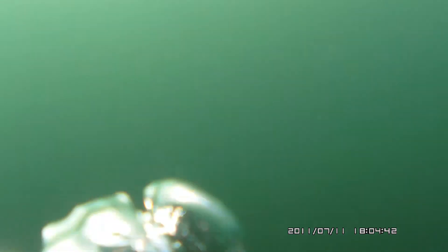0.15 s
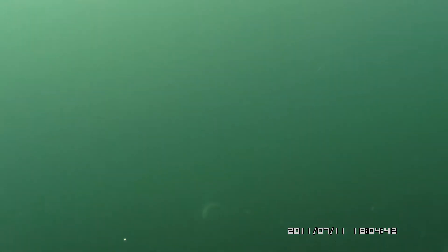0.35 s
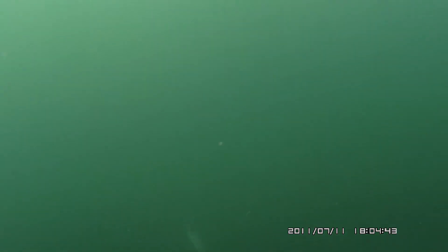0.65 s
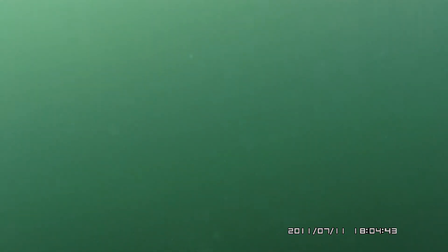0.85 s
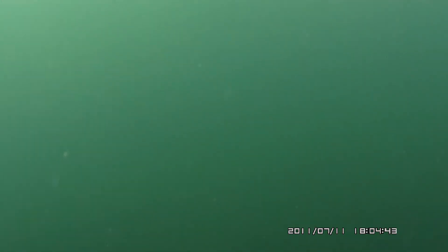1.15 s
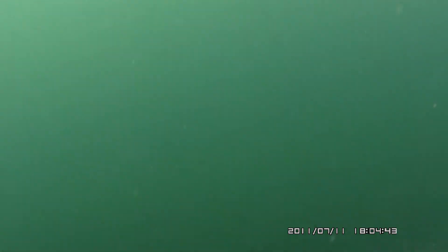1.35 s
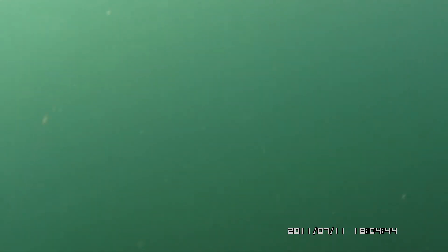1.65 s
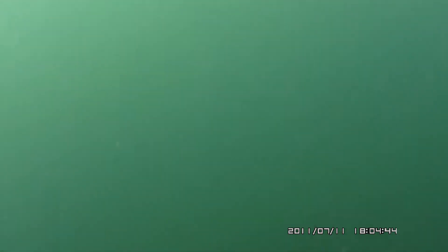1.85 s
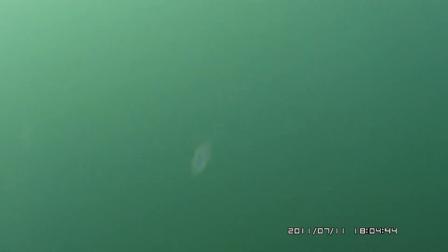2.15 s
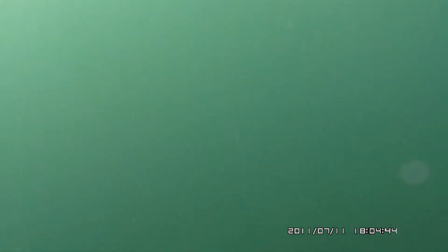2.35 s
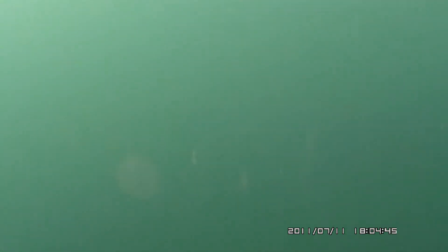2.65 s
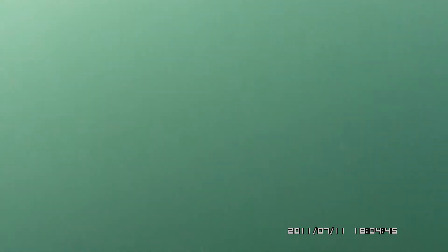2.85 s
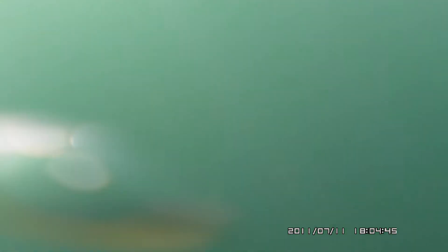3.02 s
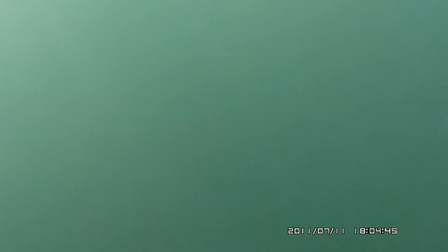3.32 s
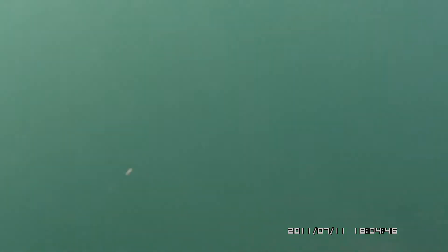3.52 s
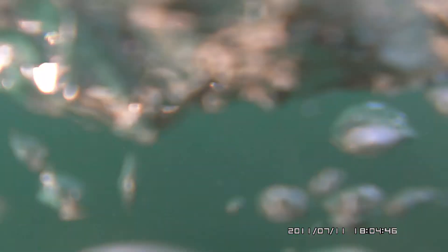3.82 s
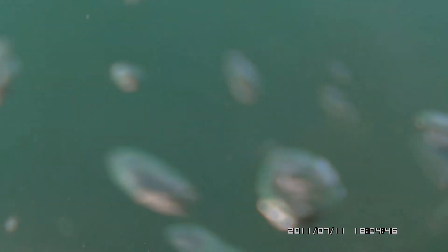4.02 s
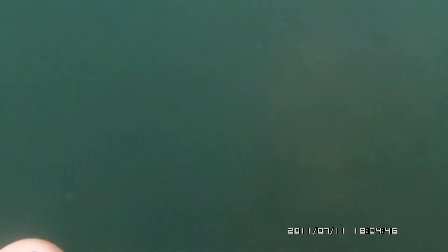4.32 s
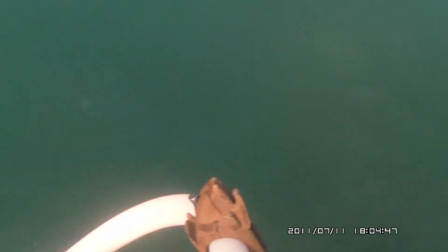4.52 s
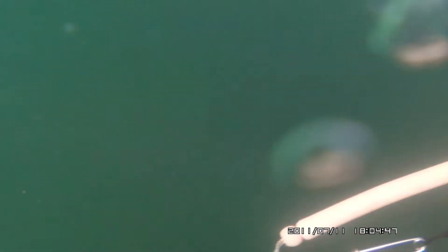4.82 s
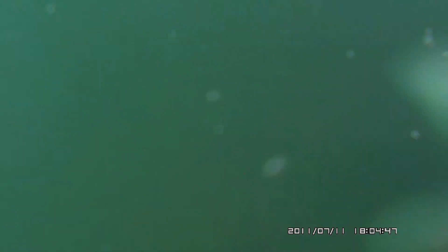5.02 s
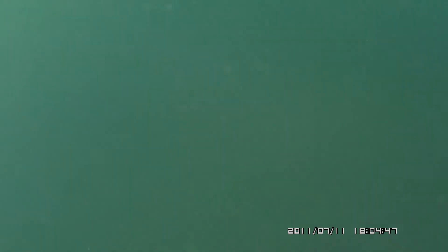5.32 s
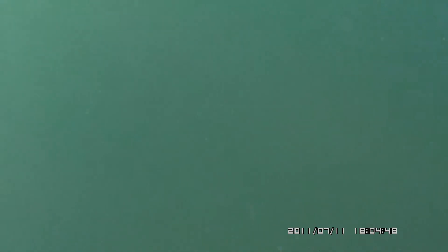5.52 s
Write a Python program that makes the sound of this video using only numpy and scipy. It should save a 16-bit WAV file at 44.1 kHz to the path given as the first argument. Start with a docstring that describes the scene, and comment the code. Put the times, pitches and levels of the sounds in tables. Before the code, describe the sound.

Close-up bubbling under the sea: sparse blips and clicks, a dense churning burst of bubbles, deep glugs, fading calm and a late sharp knock.

```python
"""Soft hiss and faint bubbling come first, just under the surface of the sea, from a small camera in a housing.
Air bubbles pinch off close by, each a decaying sine at its own pitch, and tiny ones tick on the shell.
An air pocket hums as randomly nudged resonance; past halfway a dense cloud of bubbles rushes by.
Hard bubble slaps hit the microphone during the rush, amid deep glugs, and once more near the end;
the closest bursts overload the microphone."""
import sys
import numpy as np
from scipy import signal
from scipy.fft import rfft, irfft
from scipy.io import wavfile

SR = 44100
rng = np.random.default_rng(int(sys.argv[2]) if len(sys.argv) > 2 else 0)


def transcribe(signal):
    """Save signal, clipped to [-1, 1], as a 16-bit WAV file at the path in sys.argv[1]."""
    frames = np.atleast_2d(signal).T
    limited = np.clip(frames, -1, 1)
    pcm = np.round(limited * 32767).astype(np.int16)
    wavfile.write(sys.argv[1], SR, pcm)


N = 250047
TIME = np.arange(N) / SR  # seconds


def from_db(db):
    """Decibels to an amplitude factor."""
    return 10 ** (np.asarray(db) / 20)


def rms_one(x):
    """Scale a sound to an rms of 1."""
    return x / np.sqrt(np.mean(x ** 2) + 1e-20)


def at_hz(points, hz):
    """Levels in dB read from a spectrum on a log-frequency axis."""
    freqs, levels = np.transpose(points)
    return np.interp(np.log(np.maximum(hz, 1)), np.log(freqs), levels)


def add(track, s, sound):
    """Mix a sound into the track at s seconds."""
    start = int(np.clip(round(s * SR), 0, len(track)))
    track[start:start + len(sound)] += sound[:len(track) - start]


def cut(x, hz, kind, order=2):
    """Butterworth filter; kind "high" keeps the highs, "low" keeps the lows."""
    sos = signal.butter(order, hz, kind, fs=SR, output="sos")
    return signal.sosfilt(sos, x + 1e-18)


def decay(t, t60, sag=1.0):
    """Fall by 60 dB in t60 seconds; exponential when sag is 1."""
    return np.exp(-np.log(1000) * (t / t60) ** sag)


def bubble(hz, t60, glide=0, swell_s=0.00054, sag=0.98):
    """A pulsing pocket of air: swells, dies away, drifts in pitch by the fraction glide per t60; peak near 1."""
    t = np.arange(int(np.clip(t60, 0.002, 0.2) * SR * 1.2)) / SR
    envelope = decay(t, t60, sag) * (1 - np.exp(-t / swell_s))
    ring = np.sin(2 * np.pi * hz * t * (1 + glide * t / t60 / 2))
    return envelope / envelope.max() * ring


def swarm(draws, colour, cycles, spread_db, swell_s):
    """Bubbles of random time, size and strength, each ringing for half to twice so many cycles."""
    out = np.zeros(N)
    low, high = colour[0][0], colour[-1][0]
    for when, size, strength, damping, bend in draws:
        hz = low * (high / low) ** size
        gain = from_db(at_hz(colour, hz) + spread_db * strength ** 2)
        t60 = cycles / hz * 2 ** (2 * damping - 1)
        add(out, when * N / SR, gain * bubble(hz, t60, 0.35 * (bend - 0.5), swell_s))
    return out


def coloured_noise(spectrum):
    """Noise shaped to the given spectrum; rms 1."""
    colour = from_db(at_hz(spectrum, np.arange(N // 2 + 1) * SR / N))
    return rms_one(irfft(rfft(rng.standard_normal(N)) * colour, N))


def crack(grit, t60):
    """A dry snap: noise that dies away quickly."""
    return grit * decay(TIME[:len(grit)], t60)


# Colour of the far water and microphone hiss. Each row: frequency in Hz, relative density in dB per Hz.
HISS_SPECTRUM = [(30, -33), (90, -15), (165, -9.5), (280, -9), (450, -4.5), (800, 5), (1750, -1.5),
                 (2600, -6), (4000, -12.5), (6200, -22.5), (8500, -32.5), (10000, -33.5), (12000, -25.5),
                 (15800, -29.5)]
HISS_DB = -61  # rms


def hiss():
    """Far water noise and the microphone's own hiss, as steady coloured noise."""
    return from_db(HISS_DB) * coloured_noise(HISS_SPECTRUM)


# Surges of churned water, the strongest being the passing cloud.
# Each row: crest in seconds, level in dB, rise in seconds, fall in seconds.
CHURN_SURGES = [(1.27, -42.5, 0.14, .1), (1.93, -39.5, 0.25, 0.5), (2.77, -36, 0.17, 0.15),
                (3.532, -18, .19, 0.26), (4.19, -32.5, 0.11, 0.071), (4.399, -43.5, 0.3, 0.23)]
CALM_DB = -50  # churning between the surges


def churning():
    """Strength of the churning: a calm base and bell-shaped surges, summed as power."""
    power = from_db(CALM_DB) ** 2
    for s, level_db, rise_s, fall_s in CHURN_SURGES:
        bell = np.exp(-((TIME - s) / np.where(TIME < s, rise_s, fall_s)) ** 2)
        power = power + (from_db(level_db) * bell) ** 2
    return np.sqrt(power)


# The cloud level just after a bubble of MIDDLING_DB, its dB gained per dB of bubble, and its fall.
MIDDLING_DB = -20
WAKE_DB, WAKE_FOLLOWS, WAKE_FALL_DB_PER_S = -43, 0.66, 282


def wakes():
    """Power that the near bubbles stir into the cloud, each for a moment."""
    power = np.zeros(N)
    fall = from_db(-WAKE_FALL_DB_PER_S * TIME[:SR // 4])
    for s, peak_db, *_ in NEAR_BUBBLES:
        wake = from_db(WAKE_DB + WAKE_FOLLOWS * (peak_db - MIDDLING_DB)) * fall
        add(power, s, wake ** 2)
    return power


def froth():
    """Froth breaks in separate spits of about a millisecond, heard as bright noise; rms 1."""
    spits = (rng.random(N) < 420 / SR) * from_db(10 * rng.random(N) ** 3)  # about 420 a second
    spits = signal.lfilter([1], [1, -np.exp(-1 / (0.0013 * SR))], spits + 1e-18)
    return rms_one(cut(spits * rng.standard_normal(N), 3000, "high"))


# Cloud bubbles by pitch, as heard through the housing. Each row: pitch in Hz, relative level in dB.
CLOUD_LOUDNESS = [(430, -21.5), (560, -11.5), (760, -2), (1000, 2.5), (1350, 5), (1750, 7), (2100, 2),
                  (2700, -11.5)]
# The same for the finest bubbles. Each row: pitch in Hz, relative level in dB.
FIZZ_LOUDNESS = [(2700, 9), (3400, -3.5), (4800, 8), (6300, -2), (7200, -26)]


def cloud(churn, gurgle_db=-0.5, babble_db=-4, wash_db=-1, fizz_db=-25, froth_db=-32, surge_db=-23, close_db=-45):
    """Churned water: a far wash, near gurgling bubbles, a babble of brief ones, fizz, froth and a low surge."""
    # in calm water mostly far bubbles are heard, blended smooth; churning brings them close
    near = churn ** 2 / (churn ** 2 + from_db(close_db) ** 2)
    wash = churn * (1 - near) * coloured_noise(HISS_SPECTRUM)
    big, brief, fine = rng.random((1500, 5)), rng.random((4000, 5)), rng.random((1800, 5))
    gurgle = rms_one(swarm(big, CLOUD_LOUDNESS, cycles=40.4, spread_db=6.5, swell_s=0.005))
    # bubbles packed close together damp one another, so these ring for fewer cycles
    babble = rms_one(swarm(brief, CLOUD_LOUDNESS, cycles=14.0, spread_db=7.5, swell_s=0.0019))
    fizz = rms_one(swarm(fine, FIZZ_LOUDNESS, cycles=35, spread_db=16, swell_s=0.000193))
    surge = rms_one(cut(cut(rng.standard_normal(N), 66, "high"), 276, "low"))
    layers = [(gurgle_db, gurgle), (babble_db, babble), (fizz_db, fizz), (froth_db, froth()), (surge_db, surge)]
    close_water = sum(from_db(db) * layer for db, layer in layers)
    stirred = np.sqrt((near * churn) ** 2 + near * wakes())
    return from_db(wash_db) * wash + stirred * close_water


def strays(churn, stray_db=-54, follows=0.92, count=90):
    """Faint lone bubbles drift by at random, stronger where the water is stirred."""
    lone = swarm(rng.random((count, 5)), CLOUD_LOUDNESS, cycles=70, spread_db=8, swell_s=0.001)
    return from_db(stray_db) * (churn / from_db(CALM_DB)) ** follows * lone


# Resonances of the housing around the microphone. Each row: frequency in Hz, level in dB, ring t60 in seconds.
SHELL_MODES = [(816, -5.5, .012), (1706, 3.5, 0.013), (2547, 2, 0.0044), (4950, -17, 0.0038),
               (5560, -21, 0.01), (7950, -33.5, 0.0022), (11860, -27.5, 0.0034)]


def housing(knocks):
    """Knocks on the shell ring its damped resonances, one two-pole resonator each."""
    out = np.zeros(N)
    for k, (hz, level_db, t60) in enumerate(SHELL_MODES):
        r = np.exp(-np.log(1000) / (t60 * SR))
        w = 2 * np.pi * hz / SR
        ring = signal.lfilter([0, np.sin(w)], [1, -2 * r * np.cos(w), r * r], knocks + 1e-18)
        out += (-1) ** k * from_db(level_db) * ring
    return out


def spray(drops, spray_s=0.0054, spray_cycles=15):
    """A handful of brief bubbles of many sizes, shed within a few milliseconds; scaled by its first 10 ms."""
    out = np.zeros(SR // 10)
    for k, (size, delay, damping) in enumerate(drops):
        hz = 640 + 1700 * (k + size) / len(drops)
        ring = bubble(hz, spray_cycles / hz * 2 ** (2 * damping - 1), swell_s=0.0024)
        add(out, spray_s * delay ** 2, (-1) ** k * from_db(at_hz(CLOUD_LOUDNESS, hz)) * ring)
    return out / np.std(out[:SR // 100])


# The spray shed by a bubble of MIDDLING_DB, and the dB it gains per dB of the bubble.
SPRAY_DB, SPRAY_FOLLOWS = -35, 0.83
# Single bubbles near the housing.
# Each row: start in seconds, peak level of the ring in dB, starting pitch in Hz, ring t60 in seconds.
NEAR_BUBBLES = [(0.025, -34, 816, 0.025), (0.049, -34, 840, 0.028), (0.0671, -29, 1216, 0.094),
                (0.3398, -21.5, 866, 0.037), (0.4183, -22, 2600, .002), (0.4471, -24.5, 2094, 0.022),
                (0.51, -33, 1176, 0.069), (0.669, -34, 2620, .033), (0.6812, -24, 1860, 0.0017),
                (0.751, -34.5, 2590, 0.036), (0.7651, -25.5, 880, 0.022), (0.8626, -37, 716, 0.06),
                (0.9777, -32, 756, 0.039), (1.1399, -30, 738, 0.058), (1.1997, -23.5, 2400, 0.0036),
                (1.23, -27, 1175, 0.21), (1.2626, -21.5, 794, 0.04), (1.2745, 0, 2260, 0.0039),
                (1.2873, -12.5, 1670, 0.021), (1.3092, -21.5, 824, 0.034), (1.3692, -28.5, 2460, 0.026),
                (1.5119, -19.5, 1966, 0.034), (1.6149, -26.5, 668, 0.039), (1.664, -27, 780, 0.061),
                (1.7185, -31.5, 750, .036), (1.7564, -14, 1652, 0.063), (1.8345, -13, 1815, 0.025),
                (1.897, -15.5, 1960, 0.021), (1.9176, -19, 903, 0.092), (2.0241, -32, 2505, 0.027),
                (2.0721, -27, 1690, 0.043), (2.1561, -28, 860, .033), (2.1808, -23.5, 1252, 0.06),
                (2.3343, -25, 797, 0.029), (2.6019, -26.5, 798, 0.032), (2.6325, -21, 1230, 0.015),
                (2.662, -25, 1840, 0.055), (2.7765, -14.5, 2240, 0.02), (2.7767, -14.5, 1526, 0.035),
                (2.8023, -18.5, 1430, 0.025), (2.8183, -11.5, 1710, 0.038), (2.854, -25, 1800, .005),
                (2.9197, -24.5, 1130, 0.047), (2.9899, -28.5, 1037, 0.092), (3.0449, -8.5, 1152, 0.0044),
                (3.098, -9, 2000, 0.0036), (3.2343, -11.5, 1926, 0.0067), (3.2994, -10.5, 1120, 0.028),
                (3.3423, -7, 1640, 0.0061), (3.372, -8.5, 1880, 0.032), (3.424, -10, 1730, 0.0094),
                (3.433, 0, 786, 0.045), (3.469, -7.5, 1690, 0.013), (3.5021, -2, 1433, 0.011),
                (3.5294, -8.5, 1650, 0.013), (3.559, -7.5, 1722, 0.036), (3.667, -2, 1870, 0.035),
                (3.7786, -12.5, 697, 0.043), (3.825, -12, 1470, 0.088), (3.8516, -0.5, 1750, 0.0055),
                (3.8852, -2, 1918, 0.024), (3.9027, -16, 1036, 0.051), (3.97, -5.5, 2127, 0.023),
                (3.9867, -2.5, 1490, 0.013), (4.076, -14.5, 1780, 0.0089), (4.0852, 0.5, 1720, 0.018),
                (4.0902, 2.5, 1667, 0.039), (4.1423, -11, 1666, 0.039), (4.1606, -11, 1320, 0.016),
                (4.2017, -14, 1100, 0.032), (4.3447, -28.5, 1245, .042), (4.4, -16, 677, 0.037),
                (4.4336, -25.5, 740, 0.025), (4.467, -12, 1140, 0.013), (4.5071, -4, 1983, 0.016),
                (4.5357, -26, 1420, .011), (4.5759, -12, 1210, 0.014), (4.656, -25.5, 1140, 0.047),
                (4.6683, -16, 1763, 0.036), (4.7261, -25, 1840, 0.012), (4.829, -34, 870, 0.062),
                (5.008, -37.5, 1000, 0.037), (5.039, -40.5, 1255, 0.087), (5.2916, -25, 1930, .04),
                (5.3059, -2, 940, 0.0083), (5.3129, -15, 1130, 0.044)]


def near_bubbles(knock_db=-21, snap_db=-36, snap_t60=0.021, bend=0.13, swell_s=0.00059, swell_share=0.024):
    """Each pinch-off snaps, knocks on the housing, rings, and sheds a short spray that grows with its strength."""
    out, knocks, snaps = np.zeros((3, N))
    draws = rng.random((len(NEAR_BUBBLES), 8, 3))
    grits = rng.standard_normal((len(NEAR_BUBBLES), SR // 50))
    for (s, peak_db, hz, t60), drops, grit in zip(NEAR_BUBBLES, draws, grits):
        glide = bend * (1 - 3 * drops[0, 2])  # up or down, at random
        ring = bubble(hz, t60, glide, swell_s=swell_s + swell_share * t60)
        spray_db = SPRAY_DB + SPRAY_FOLLOWS * (peak_db - MIDDLING_DB)
        add(out, s, from_db(peak_db) * ring)
        add(knocks, s, from_db([peak_db + knock_db]))
        add(snaps, s, from_db(peak_db + snap_db) * crack(grit, snap_t60))
        add(out, s, from_db(spray_db) * spray(drops))
    return out + housing(knocks) + cut(snaps, 4000, "high")


# Tiny bubbles bursting on the housing, levels before the trims of ticks().
# Each row: start in seconds, peak level in dB, pitch in Hz, crack level in dB.
SHELL_TICKS = [(0.34, -24.5, 3880, -64), (0.4185, -40, 3420, -60), (0.5729, -30.5, 3340, -34),
               (0.6836, -31.5, 3830, -33.5), (1.2594, -24, 4220, -50), (1.836, -44, 3800, -30),
               (1.8529, -22.5, 3560, -50), (1.9422, -27, 3240, -60), (2.3327, -28, 4120, -58),
               (2.567, -33, 3150, -70), (2.6025, -31.5, 4027, -37), (2.6715, -35.5, 3100, -33),
               (2.7115, -31.5, 3300, -58), (2.744, -17, 4260, -32), (2.8011, -16.5, 3173, -53),
               (2.818, -20.5, 3900, -37), (2.838, -35, 3700, -58), (3.0959, -16, 3470, -55),
               (3.1923, -22.5, 3060, -55), (3.2167, -26.5, 2940, -33), (3.3132, -18.5, 3680, -49),
               (3.4042, -22.5, 5000, -40), (3.571, -33, 4500, -20), (3.8014, -10.5, 4700, -44),
               (3.869, -17, 6130, -36), (4.6466, -36.5, 3240, -31)]
TICK_CYCLES = 33  # ring t60 in cycles


def ticks(ping_db=-2, knock_db=-2, snap_db=-3, snap_t60=0.0023):
    """A tiny bubble bursts on the shell: a dry crack, a high ping and a knock."""
    out, knocks, cracks = np.zeros((3, N))
    grits = rng.standard_normal((len(SHELL_TICKS), SR // 50))
    for (s, peak_db, hz, crack_db), grit in zip(SHELL_TICKS, grits):
        add(out, s, from_db(peak_db + ping_db) * bubble(hz, TICK_CYCLES / hz, swell_s=0.000074))
        add(knocks, s, from_db([peak_db + knock_db]))
        add(cracks, s, from_db(crack_db + snap_db) * crack(grit, snap_t60))
    return out + housing(knocks) + cut(cracks, 2500, "high")


# Swells of a large wobbling air pocket. Each row: crest in seconds, level in dB before the trim pocket_db.
AIR_POCKET_SWELLS = [(1.16, -41.5), (1.33, -42), (1.65, -44.5), (1.82, -31.5), (2.299, -48.5),
                     (2.52, -45.5)]
# Its pitch at the first swell, sinking steadily as it grows.
POCKET_HZ, POCKET_SAG_HZ_PER_S = 674, 112


def air_pocket(width_hz=32, pocket_db=-2, rise_db_per_s=140, fall_db_per_s=100):
    """The flow nudges a large pocket of air in fits, and it hums unsteadily around its own pitch."""
    hz = POCKET_HZ - POCKET_SAG_HZ_PER_S * (TIME - AIR_POCKET_SWELLS[0][0])
    phase = 2 * np.pi * np.cumsum(hz) / SR
    level = np.zeros(N)
    for s, db in AIR_POCKET_SWELLS:
        level += from_db(db - np.maximum(rise_db_per_s * (s - TIME), fall_db_per_s * (TIME - s)))
    fits = from_db(4.5 * rms_one(cut(rng.standard_normal(N), 14, "low")))  # slow random gain
    nudges = fits * cut(rng.standard_normal((2, N)), width_hz, "low")
    hum = rms_one(nudges[0] * np.cos(phase) + nudges[1] * np.sin(phase))
    return from_db(pocket_db) * level * hum


# Large bubbles slapping right onto the microphone.
# Each row: start in seconds, peak level of the ring in dB, pitch in Hz, crack level in dB before filtering.
MICROPHONE_SLAPS = [(3.6352, 2.5, 1362, -52), (4.0938, -0.5, 1810, -16.5), (5.3062, 6.5, 1797, -9.5)]


def slaps(ring_t60=0.0098, knock_db=-9, spray_db=-13, crack_t60=0.019, dull_hz=7000):
    """A large bubble hits the microphone: a hard knock and crack, a short ring and a heavy spray."""
    out, knocks, cracks = np.zeros((3, N))
    draws = rng.random((len(MICROPHONE_SLAPS), 8, 3))
    grits = rng.standard_normal((len(MICROPHONE_SLAPS), SR // 50))
    for (s, peak_db, hz, crack_db), drops, grit in zip(MICROPHONE_SLAPS, draws, grits):
        add(out, s, from_db(peak_db) * bubble(hz, ring_t60))
        add(out, s, from_db(peak_db + spray_db) * spray(drops))
        add(knocks, s, from_db([peak_db + knock_db]))
        add(cracks, s, from_db(crack_db) * crack(grit, crack_t60))
    dulled = cut(cut(cracks, 3200, "high"), dull_hz, "low", order=1)
    return out + housing(knocks) + dulled


# Deep glugs in the wake of the rush. Each row: start in seconds, peak level in dB, starting pitch in Hz.
DEEP_GLUGS = [(3.904, -22, 467), (4.101, -37.5, 405), (4.194, -32.5, 528)]


def glugs(ring_t60=0.113, rise=0.194):
    """Big bubbles break loose and ring upward in pitch as they near the surface."""
    out = np.zeros(N)
    for s, peak_db, hz in DEEP_GLUGS:
        add(out, s, from_db(peak_db) * bubble(hz, ring_t60, glide=rise, swell_s=0.001))
    return out


def scene(stiff_hz=260):
    """All the bubbles together; the stiff shell lets little bass through, and the hiss lies on top."""
    churn = churning()
    water = cloud(churn) + strays(churn) + near_bubbles() + ticks() + air_pocket() + slaps() + glugs()
    return (cut(water, stiff_hz, "high") + hiss())[None]


OVERLOAD = 0.71  # clipping level, as a share of full scale
CUTOFF_HZ = 16000


def record(dry, lopsided=0.012):
    """Peaks are clipped flat; the microphone yields unevenly, so loud bursts thud; the top is cut."""
    clipped = np.clip(dry, -OVERLOAD, OVERLOAD)
    thud = cut(cut(clipped ** 2, 330, "low"), 30, "high", order=1)
    top_cut = signal.ellip(10, 0.1, 70, CUTOFF_HZ, fs=SR, output="sos")
    return signal.sosfilt(top_cut, clipped + lopsided * thud)


dry = scene()
out = record(dry)
transcribe(out)
```